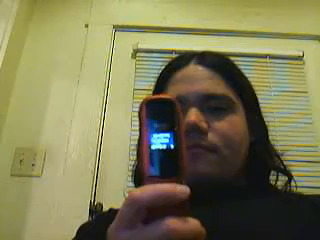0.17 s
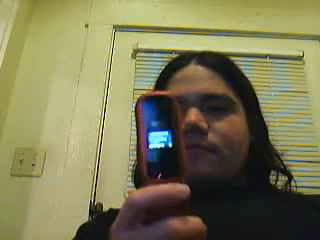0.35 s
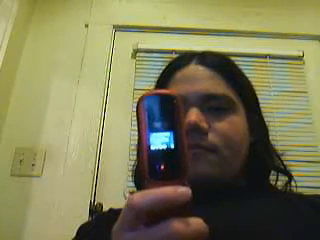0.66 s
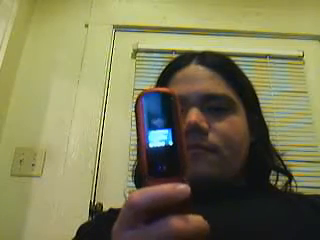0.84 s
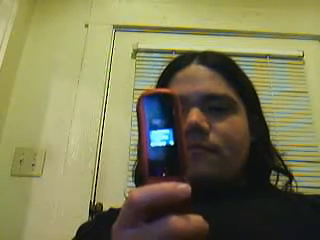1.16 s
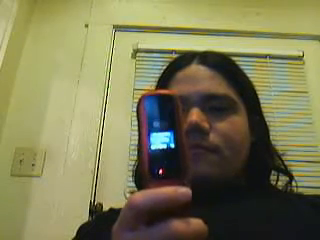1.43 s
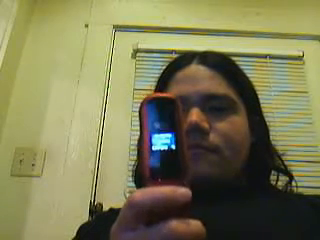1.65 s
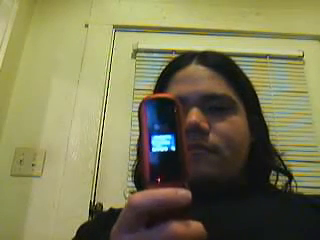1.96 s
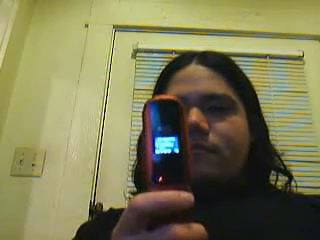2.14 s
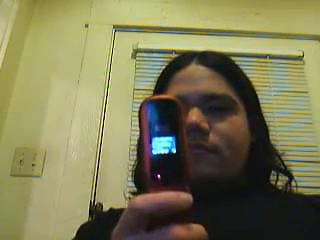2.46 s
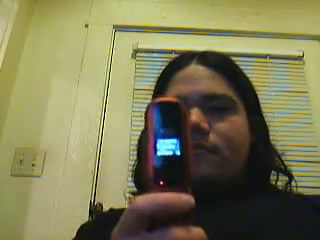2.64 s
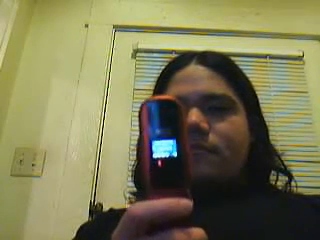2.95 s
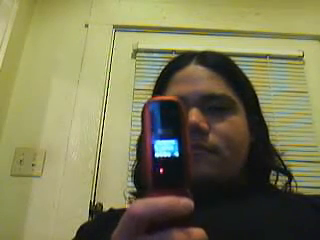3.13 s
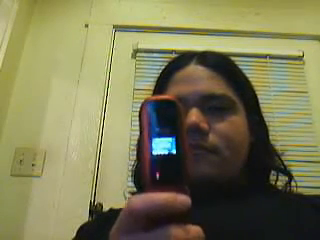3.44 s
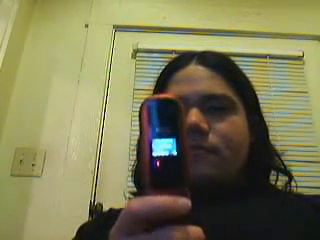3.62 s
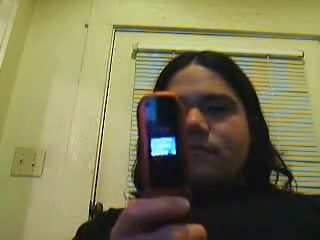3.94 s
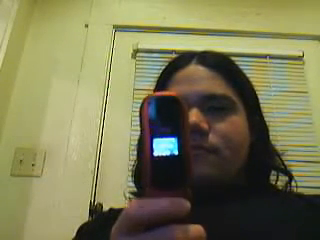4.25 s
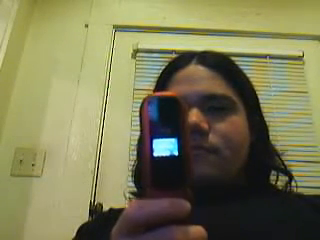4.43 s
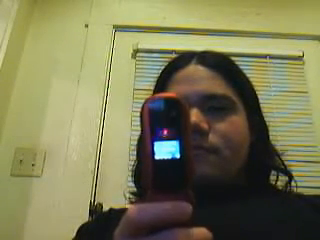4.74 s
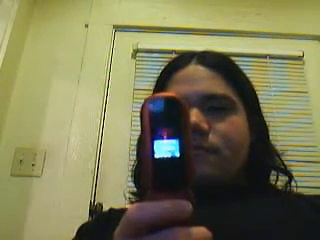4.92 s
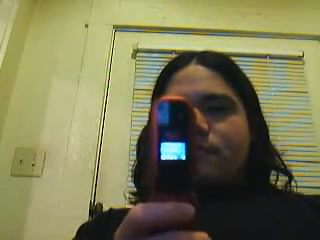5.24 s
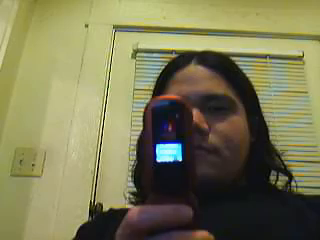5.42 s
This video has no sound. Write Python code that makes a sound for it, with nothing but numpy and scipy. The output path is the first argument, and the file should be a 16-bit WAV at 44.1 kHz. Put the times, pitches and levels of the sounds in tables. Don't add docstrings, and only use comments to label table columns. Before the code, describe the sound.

A cheap computer microphone in a bare room picks up constant hiss, a low fan and mains hum, a thin electronic whine and dense, tiny electrical crackle, with the highest treble missing. From 0.1 s a thumb clicks the keys of a small plastic phone held close: four light snaps by 0.4 s, another at 0.7 s. Barely audible furniture creaks lie near 0.4 and 0.7 s. At 0.93 s a sharp static tick jumps out, louder than the keys. One click follows at 1.2 s, then a gap until 2.0 s. Uneven clicks, brighter presses and duller releases, continue through 2.75 s, then cluster from 3.1 to 3.8 s, with a final crisp one at 4.0 s. Each is dry and tiny, with a faint bright room reflection. At 4.2 s a fingertip taps the shell softly and dully. Only hiss, hum and scattered static ticks remain until 5.6 s.

```python
import sys
import numpy as np
from scipy import signal
from scipy.fft import rfft, irfft, next_fast_len
from scipy.io import wavfile

SR = 44100
rng = np.random.default_rng(int(sys.argv[2]) if len(sys.argv) > 2 else 0)


def attenuation_scalar(level_db):
    decades = np.asarray(level_db, float) / 20
    return 10 ** decades


def wav_record(signal):
    frames = np.transpose(np.atleast_2d(signal))
    bounded = np.clip(frames, -1, 1)
    quanta = np.round(bounded * 32767).astype(np.int16)
    wavfile.write(sys.argv[1], SR, quanta)


N = 246412

# f/Hz, density/dB per Hz
HISS_SPECTRUM = [(20, -18.5), (50, -5.5), (100, 3.5), (200, -4), (400, -3), (800, -5.5), (1200, -7),
                 (1550, -5), (2200, -10), (3500, -9.5), (5300, -4), (6200, -8), (13000, -18.5)]
HISS_DB = -48.5

FAN_HZ, MAINS_HZ, BUS_HZ = 24.955, 60.01, 999.9
# multiple of FAN_HZ, level/dB rms
FAN_LINES = [(4, -73), (5, -68), (6, -66), (7, -69), (8, -68), (14, -73.5), (15, -71.5), (16, -59),
             (17, -60), (18, -68.3), (19, -70.5), (33, -63), (49, -68.5)]
# multiple of MAINS_HZ, level/dB rms
MAINS_LINES = [(3, -61.5), (5, -64)]
# fan multiples below BUS_HZ, level/dB rms
BUS_LINES = [(0, -69), (16, -69), (17, -67.5)]
# f/Hz, level/dB rms
STRAY_LINES = [(72.3, -75), (237.2, -69.5), (6049.8, -67.6)]
SWAY_DB, SWAY_HZ = 1.0, 0.777

CRACKLE_PER_S, CRACKLE_DB, CRACKLE_SPREAD_DB, CRACKLE_TOP_DB = 420, -41, 2.4, -31
# t/s, peak/dB
SPARKS = [(0.2385, -29), (0.927, -8.4), (1.0871, -28.7), (1.2273, -27.9), (1.2947, -26.8), (1.5223, -25),
          (2.5156, -29), (3.0509, -21), (4.5071, -20.1), (4.7027, -28), (4.7091, -27.9), (4.9784, -28.4),
          (5.2429, -28.2), (5.466, -26.9), (5.4804, -25.7)]
# t/s, peak/dB
SWING = (3.9952, -27.5)
SPIKE_BAND_HZ = 6600

# t/s, shell level/dB, shell f/Hz, lid level/dB, dome level/dB
KEY_SNAPS = [(0.1029, -36, 1520, -37, -37), (0.168, -60, 1520, -42, -34), (0.2754, -42.5, 1440, -44.5, -36),
             (0.3755, -54, 1490, -44, -34.5), (0.697, -43, 1730, -46, -33),
             (1.172, -30.5, 1520, -40.5, -31), (2.0077, -32.5, 1590, -35.5, -26.5),
             (2.1463, -39.5, 1600, -51, -48), (2.2521, -35.5, 1450, -34, -22.5),
             (2.563, -32.5, 1600, -35.5, -28), (2.7464, -34, 1426, -45, -41),
             (3.0874, -32.5, 1510, -40.5, -30.5), (3.2425, -41.5, 1550, -47, -34),
             (3.283, -39.5, 1460, -43, -37), (3.4138, -43.5, 1460, -47, -39),
             (3.5298, -29, 1630, -23.5, -22.5), (3.6785, -25.5, 1625, -28.5, -46),
             (3.7688, -50, 1460, -54, -33.5), (4.0229, -32.5, 1620, -31, -25.5)]
# rise/share of length, level/dB
SHELL_RING = (0.54, 0.5)
# f/Hz, rise/s, length/s, level/dB, crest/s
LID_MODES = [(1130, .0003, .0011, -8, .0003), (2330, .0003, .0018, 0, .0003),
             (3080, .0004, .0019, -1, .0003)]
# f/Hz, rise/s, length/s, level/dB, crest/s
DOME_MODES = [(4050, .0004, .001, -12, .0004), (4600, .0009, .0026, -9, .0005),
              (5200, .0006, .0011, 0, .0006)]
# rise/s, length/s, level/dB
GRIP_RING = (0.00052, 0.0023, -10.5)
DETUNE_SHARE = 0.02
RING_S, RING_HZ, CHOKE_POWER = 0.0032, 1520, 3.1
RELEASE_RISE_SHARE = 0.2

# delay/s, level/dB
ECHOES = [(.0034, -19), (.0097, -10), (.0116, -16), (.0175, -18), (.0249, -14), (.0267, -20), (.0340, -22)]
TAIL_DB, TAIL_T60_S = -27.5, 0.2
WALL_LOW_HZ, WALL_TOP_HZ, SCATTER_S = 3600, 6200, 0.00015

# t/s, f/Hz, half length/s, level/dB
CREAKS = [
    (0.38, 551, 0.058, -53),
    (0.708, 776, .04, -58),
]

# t/s, level/dB, contact/s
THUD = (4.1858, -32, .00025)
# f/Hz, rise/s, length/s, level/dB
KNOCK = (1500, .001, .003, -43)

# edge f/Hz, gain/dB
TREBLE_STEPS = [(6280, -9), (7150, -36.5), (8200, -84)]
# edge f/Hz, level/dB
RESIDUE_STEPS = [(7150, -86), (8200, -88.5), (9330, -74), (10720, -102), (11320, -87), (11700, -90),
                 (12000, -140)]
CONVERTER_OFFSET = -0.1775


def shape(x, gain):
    size = next_fast_len(len(x) + SR // 10)
    hz = np.arange(size // 2 + 1) * SR / size
    return irfft(rfft(x, size) * gain(hz), size)[:len(x)]


def hiss():
    hz, db = np.transpose(HISS_SPECTRUM)

    def colour(f):
        return attenuation_scalar(np.interp(np.log(f + 1), np.log(hz), db))

    return attenuation_scalar(HISS_DB + 10) * shape(rng.standard_normal(N), colour)


def hum():
    t = np.arange(N) / SR
    lines = [(k * FAN_HZ, db) for k, db in FAN_LINES]
    lines += [(k * MAINS_HZ, db) for k, db in MAINS_LINES]
    lines += [(BUS_HZ - k * FAN_HZ, db) for k, db in BUS_LINES]
    lines += STRAY_LINES
    out = np.zeros(N)
    for hz, rms_db in lines:
        pace, sway_phase, phase = rng.random(3)
        sway_db = SWAY_DB * np.sin(2 * np.pi * ((1 + pace) * SWAY_HZ * t + sway_phase))
        out += np.sqrt(2) * attenuation_scalar(rms_db + sway_db) * np.sin(2 * np.pi * (hz * t + phase))
    return out


def crackle():
    hit, size = rng.random((2, N))
    bed_db = np.minimum(CRACKLE_DB - CRACKLE_SPREAD_DB * np.log(1 - size), CRACKLE_TOP_DB)
    out = attenuation_scalar(bed_db) * (hit < CRACKLE_PER_S / SR)
    for s, peak_db in SPARKS:
        out[int(round(s * SR))] = attenuation_scalar(peak_db)
    swing_s, swing_db = SWING
    i = int(swing_s * SR)
    out[i - 2] = -attenuation_scalar(swing_db)
    out[i + 2] = attenuation_scalar(swing_db)
    return (out - out.mean()) * SR / (2 * SPIKE_BAND_HZ)


def ring(hz, rise_s, length_s, db, crest_s=0.00031):
    t = np.arange(SR // 40) / SR
    swell = (1 - np.exp(-t / abs(rise_s))) * np.exp(-(t / length_s) ** 3)
    return attenuation_scalar(db) * swell / swell.max() * np.cos(2 * np.pi * hz * (t - crest_s))


def keys():
    out = np.zeros(N + SR)
    rise_share, trim_db = SHELL_RING
    for s, shell_db, shell_hz, lid_db, dome_db in KEY_SNAPS:
        is_press = dome_db > shell_db - 13
        way, quick = (-1, 1) if is_press else (1, RELEASE_RISE_SHARE)
        length_s = RING_S * (RING_HZ / shell_hz) ** CHOKE_POWER
        snap = ring(shell_hz, quick * rise_share * length_s, length_s, shell_db + trim_db)
        snap += attenuation_scalar(shell_db) * ring(shell_hz / 2, *GRIP_RING)
        for part_db, modes in [(lid_db, LID_MODES), (dome_db, DOME_MODES)]:
            for hz, rise_s, length_s, db, crest_s in modes:
                mode_hz = hz * (1 + DETUNE_SHARE * rng.standard_normal())
                snap += attenuation_scalar(part_db) * ring(mode_hz, quick * rise_s, length_s, db, crest_s)
        i = int(s * SR)
        out[i:i + len(snap)] += way * snap
    return out[:N]


def walls(x):
    t = np.arange(SR // 4) / SR
    echo = attenuation_scalar(TAIL_DB) * attenuation_scalar(-60 * t / TAIL_T60_S) * (t > 0.002)
    for delay_s, db in ECHOES:
        smear = np.exp(-((t - delay_s) / SCATTER_S) ** 2)
        echo += attenuation_scalar(db) * smear / np.sqrt(SCATTER_S * SR)
    wet = signal.fftconvolve(x, echo * rng.standard_normal(len(t)))[:N]

    def reflect(f):
        return f ** 2 / (f ** 2 + WALL_LOW_HZ ** 2) / np.sqrt(1 + (f / WALL_TOP_HZ) ** 8)

    return shape(wet, reflect)


def creaks():
    t = np.arange(N) / SR
    out = np.zeros(N)
    for s, hz, half_s, db in CREAKS:
        out += attenuation_scalar(db) * np.exp(-((t - s) / half_s) ** 2) * np.sin(2 * np.pi * hz * t)
    return out


def fingertip():
    t = np.arange(N) / SR
    s, db, contact_s = THUD
    out = attenuation_scalar(db) * np.exp(-((t - s) / contact_s) ** 2)
    knock = ring(*KNOCK)
    i = int((s + contact_s) * SR)
    out[i:i + len(knock)] += knock
    return out


def scene():
    noise = hiss() + hum() + crackle()
    pressed = keys()
    return (noise + pressed + walls(pressed) + creaks() + fingertip())[None, :]


def stairs(table, under_gain):
    edge_hz, db = np.transpose(table)
    gains = np.append(under_gain, attenuation_scalar(db))
    return lambda f: gains[np.searchsorted(edge_hz, f)]


def roll_off(x):
    return signal.sosfilt(signal.butter(12, 12000, fs=SR, output="sos"), x)


def record(dry):
    stepped = shape(dry[0], stairs(TREBLE_STEPS, under_gain=1))
    residue = shape(rng.standard_normal(N), stairs(RESIDUE_STEPS, under_gain=0))
    mix = (stepped + residue + CONVERTER_OFFSET)[None, :]
    return roll_off(mix)


dry = scene()
out = record(dry)
wav_record(out)
```